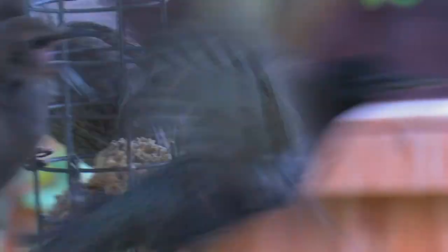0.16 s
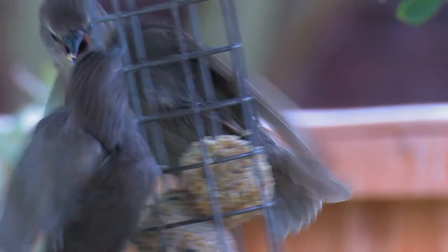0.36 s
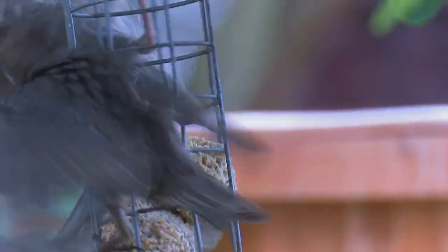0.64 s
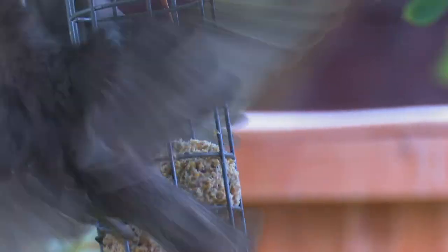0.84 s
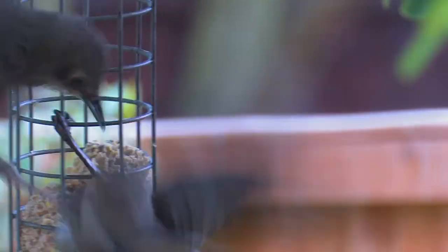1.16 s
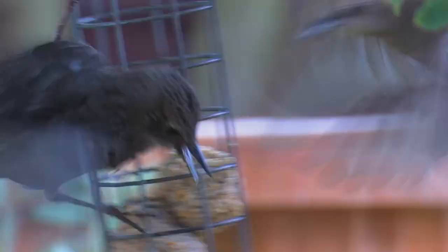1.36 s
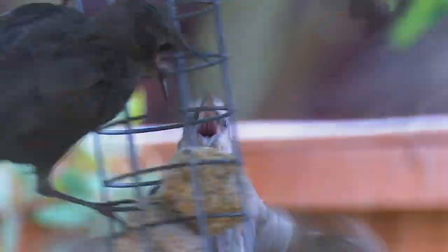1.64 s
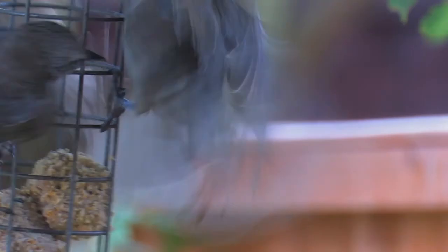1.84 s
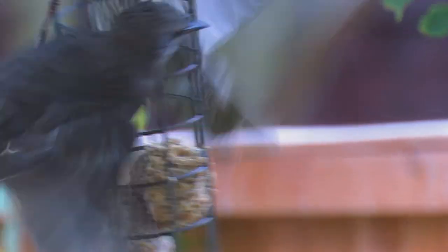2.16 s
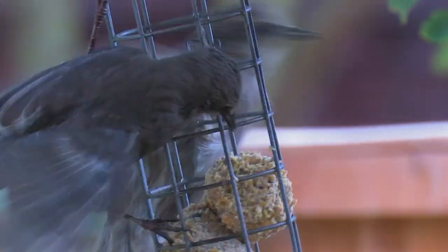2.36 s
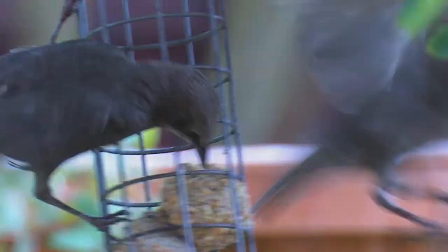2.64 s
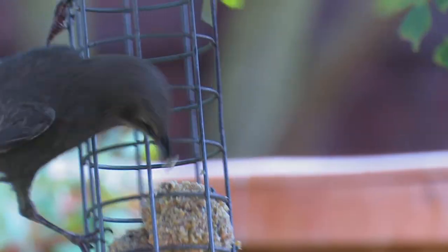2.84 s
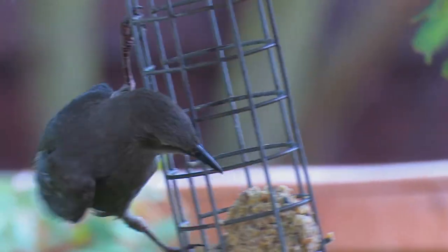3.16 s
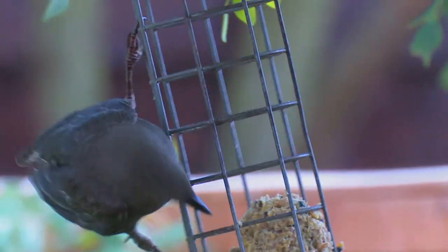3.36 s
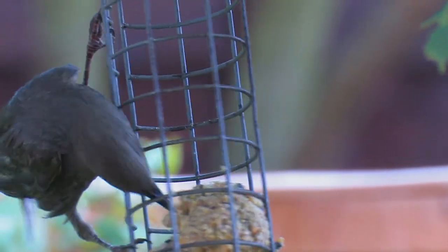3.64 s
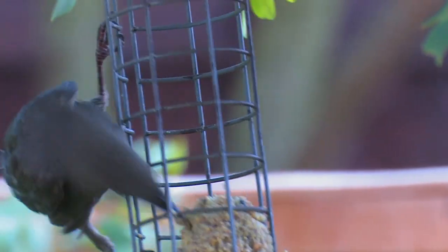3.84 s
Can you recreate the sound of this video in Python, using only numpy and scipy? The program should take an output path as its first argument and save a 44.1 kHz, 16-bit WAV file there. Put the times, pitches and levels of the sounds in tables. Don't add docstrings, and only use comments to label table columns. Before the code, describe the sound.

Young starlings squabble close by: harsh, two-toned squawks and gliding squeals overlap densely from 0 to 2.2 s, with rapid trills at the start and, louder, around 0.9 s. Faint wing whistles and a low engine drone fade within the first second. Calls thin out by 2.7 s. Hoarse distant pigeon coos run 2.1-3.8 s, with light claw ticks on wire, faint far whistles and soft rumble. Sharp squawks return at 3.85 s.

```python
import sys
import numpy as np
from scipy import signal
from scipy.fft import rfft, irfft, next_fast_len
from scipy.io import wavfile
from scipy.ndimage import uniform_filter1d, map_coordinates

SR = 44100
rng = np.random.default_rng(int(sys.argv[2]) if len(sys.argv) > 2 else 0)


def inscribe(sig):
    pcm = np.round(np.clip(np.atleast_2d(sig).T, -1, 1) * 32767)
    wavfile.write(sys.argv[1], SR, pcm.astype(np.int16))


def volts_from_decibels(level):
    exponent = np.asarray(level, float) / 20
    return 10 ** exponent


N = 176400
T = np.arange(N) / SR
ATTACK_S, RELEASE_S = 0.006, 0.016


def unit(x):
    return x / np.sqrt(np.mean(x ** 2) + 1e-20)


def along(points, hz):
    f, v = np.transpose(points)
    return np.interp(np.log(hz + 1), np.log(f + 1), v)


def wobble(rate, size):
    knots = rng.standard_normal(2400)
    return map_coordinates(knots, [np.arange(size) * min(rate / SR, 2390 / size)])


def noise(spectrum, size):
    m = next_fast_len(size + 8192)
    colour = volts_from_decibels(along(spectrum, np.fft.rfftfreq(m, 1 / SR)))
    return unit(irfft(rfft(rng.standard_normal(m)) * colour, m)[:size])


def gate(t, length, attack, release):
    return np.clip(np.minimum(t / attack, (length - t) / release + 0.5), 0, 1) ** 2


def hoarse(rough, size):
    rough = np.clip(rough, 0, 1)
    return np.sqrt(1 - rough ** 2) + rough * unit(wobble(1000, size))


def tone(hz, overtones_db, rough=0):
    turn = 2 * np.pi * np.cumsum(hz) / SR
    total = 0
    for k, db in enumerate([0, *overtones_db], start=1):
        audible = k * hz < SR / 2
        total = total + volts_from_decibels(db) * hoarse(rough * k, len(hz)) * np.sin(k * turn) * audible
    return np.sqrt(2) * total


def add(mix, s, sound):
    i = round(s * SR)
    mix[max(i, 0):i + len(sound)] += sound[max(-i, 0):N - i]


def squawk_voice(hz, size):
    rasp = volts_from_decibels(5 * np.minimum(wobble(150, size), 1))
    pitch = hz * np.exp(0.075 * wobble(150, size))
    return rasp * tone(pitch, [-17], rough=0.8)


def squawks():
    # (start [s], length [s], level [dB], upper voice [Hz])
    squawk_calls = [(-.02, 0.11, -40, 5500), (0.149, 0.1, -36, 5430), (0.052, 0.21, -37, 5170),
                    (0.292, 0.052, -27.5, 4770), (0.378, 0.095, -28, 5114), (0.431, .07, -32.5, 4590),
                    (0.448, 0.057, -31, 4177), (0.49, 0.15, -35.5, 4834), (0.584, 0.055, -32.5, 4984),
                    (0.717, 0.072, -34.5, 6440), (0.786, 0.08, -36, 5940), (0.861, 0.063, -34.5, 4420),
                    (0.913, 0.16, -37.5, 5790), (0.932, .14, -39.5, 4306), (1.138, 0.018, -33, 3994),
                    (1.321, 0.046, -39, 4366), (1.423, 0.063, -41.5, 3597), (1.49, 0.41, -43.5, 5920),
                    (1.578, 0.14, -38.5, 4400), (1.649, 0.2, -34, 5296), (1.709, 0.055, -33.5, 5300),
                    (1.761, 0.021, -49, 4660), (1.81, 0.09, -37, 4526), (1.868, 0.08, -39.5, 4580),
                    (1.98, 0.11, -34, 4785), (2.064, 0.088, -41.5, 4670), (2.153, 0.077, -37, 5000),
                    (2.349, 0.072, -40, 4810), (2.349, 0.069, -40.5, 3174), (2.46, 0.063, -34.5, 5150),
                    (2.459, 0.057, -37, 3500), (2.159, 0.056, -44.5, 2890), (2.636, 0.022, -36, 5840),
                    (3.845, 0.054, -46, 4300), (3.858, 0.11, -45, 3216), (3.942, .08, -45.5, 4490),
                    (3.963, .06, -44, 2910), (3.409, 0.16, -61, 2580), (3.468, 0.06, -68, 3900),
                    (3.636, 0.09, -67.5, 5500), (1.222, 0.044, -45, 4500), (1.371, 0.048, -48, 4520),
                    (1.434, 0.047, -49.5, 6560), (3.247, 0.11, -59.5, 3900)]
    # (frequency [Hz], density [dB per Hz])
    gape_breath = [(710, -35), (1200, -28.5), (5410, -14), (6440, -12), (9610, -25), (16000, -40)]
    breath_voice_hz = 4900
    mix, t = np.zeros(N), T[:int(0.25 * SR)]
    for s, length, db, hz in squawk_calls:
        upper = squawk_voice(hz, len(t))
        lower = volts_from_decibels(-3) * squawk_voice(hz * 0.68, len(t))
        lowest = volts_from_decibels(-12) * squawk_voice(hz * 0.46, len(t))
        voices = unit(upper + lower + lowest)
        gape = [(f * hz / breath_voice_hz, level) for f, level in gape_breath]
        breath = unit(volts_from_decibels(2.5 * wobble(38, len(t))) * noise(gape, len(t)))
        envelope = volts_from_decibels(db - 2.5) * gate(t, length, ATTACK_S, RELEASE_S)
        add(mix, s, envelope * (voices + volts_from_decibels(-5) * breath))
    return mix


def squeal_strand(hz, rough, waver, overtones_db):
    flutter = volts_from_decibels(rough * 7 * np.minimum(wobble(113.0, len(hz)), 0.5))
    pitch = hz * np.exp(rough * waver * wobble(194.7, len(hz)))
    return flutter * tone(pitch, overtones_db, rough)


def glide(db, rough, points, waver, overtones_db):
    s, hz = np.transpose(points)
    t = T[:int(0.4 * SR)]
    pitch = uniform_filter1d(np.interp(t + s[0], s, hz), size=200)
    main = squeal_strand(pitch, rough, waver, overtones_db)
    lower = squeal_strand(pitch * 0.8, 0.645, waver, overtones_db)
    both = main + rough * volts_from_decibels(-11.5) * lower
    return volts_from_decibels(db) * gate(t, s[-1] - s[0], ATTACK_S, RELEASE_S) * unit(both)


def squeals():
    # (level [dB], roughness [0-1], pitch points (time [s], pitch [Hz]))
    early_cries = [(-41.5, 0.34, [(-.01, 4100), (.05, 3440)]), (-35, 0.65, [(.19, 3000), (.235, 3080),
                   (.26, 3404), (.295, 2780)]), (-44, .6, [(.01, 6040), (.04, 6640), (.06, 6500)]),
                   (-43.5, .6, [(.165, 4900), (.195, 5740), (.24, 6000), (.29, 5350)]),
                   (-36.5, 0.28, [(.44, 2950), (.53, 3450), (.578, 2920)]), (-37.5, 0.67, [(.44, 6140),
                   (.49, 6850), (.54, 6360), (.58, 5780)]), (-36, 0.4, [(.622, 7500), (.665, 6380),
                   (.692, 6380)]), (-43, .6, [(.365, 2700), (.42, 2113)]), (-30.5, 0.58, [(.728, 5440),
                   (.78, 5950)]), (-44, 0.485, [(.76, 6900), (.8, 7250), (.87, 6480)]),
                   (-46, 0.91, [(.73, 3000), (.77, 2580), (.86, 3400)]), (-38.5, 0.57, [(1.03, 4855),
                   (1.15, 4830)]), (-45.5, 0.4, [(1.07, 2247), (1.105, 3310), (1.14, 3220)]),
                   (-42, 0.42, [(1.237, 6200), (1.255, 6720), (1.28, 6720), (1.3, 6190), (1.325, 6370),
                   (1.345, 6870), (1.375, 6500)]), (-46, 0.45, [(1.34, 3276), (1.42, 3080)]),
                   (-39.5, .3, [(1.423, 3410), (1.44, 2970)]), (-47.5, 0.27, [(1.465, 2550), (1.49, 2600)])]
    # (level [dB], roughness [0-1], pitch points (time [s], pitch [Hz]))
    late_cries = [(-36, 0.48, [(1.507, 4450), (1.525, 4240), (1.56, 4410), (1.575, 4130)]),
                  (-31.5, 0.43, [(1.572, 3610), (1.588, 3860), (1.6, 3460)]), (-37, .7, [(1.605, 4500),
                  (1.635, 4530)]), (-29, 0.57, [(1.65, 4395), (1.667, 5530), (1.685, 5550), (1.702, 4600)]),
                  (-32, 0.66, [(1.53, 5390), (1.552, 5600)]), (-43, 0.55, [(1.598, 2413), (1.635, 2800)]),
                  (-49.5, 0.42, [(1.85, 2500), (1.875, 2735), (1.925, 2540)]), (-30.5, 0.79, [(1.75, 4700),
                  (1.775, 5950), (1.79, 6710), (1.815, 6300)]), (-31, 0.57, [(1.752, 4610), (1.77, 4610),
                  (1.79, 3570)]), (-29.5, 0.92, [(1.81, 5260), (1.83, 4656), (1.85, 3810)]),
                  (-38.5, 0.56, [(1.94, 5500), (1.965, 5170), (1.99, 6050), (2.03, 5380), (2.05, 4860)]),
                  (-45, 0.33, [(1.97, 2900), (1.986, 2970)]), (-32.5, 0.75, [(2.0, 4510), (2.04, 4400),
                  (2.07, 4254), (2.095, 4900), (2.122, 5890), (2.16, 5240)]), (-42, 0.65, [(2.165, 3190),
                  (2.18, 5300), (2.203, 5600), (2.215, 4200), (2.233, 3600)]), (-37, 0.59, [(2.638, 3380),
                  (2.648, 5460), (2.662, 6530), (2.69, 6560), (2.71, 6050)]), (-44, .5, [(2.697, 6000),
                  (2.706, 3750), (2.714, 2200)]), (-56.5, 0.6, [(3.26, 6100), (3.295, 6200), (3.315, 7300),
                  (3.33, 7450)]), (-26, 0.075, [(3.949, 4120), (3.954, 4400)])]
    # (level [dB], roughness [0-1], pitch points (time [s], pitch [Hz]))
    far_whistles = [(-55, 0.69, [(3.41, 1850), (3.48, 1890), (3.5, 2426), (3.56, 2390)]),
                    (-52.5, 0.67, [(3.5, 1783), (3.565, 1860)]), (-63, 0.51, [(3.32, 2017), (3.4, 2040)]),
                    (-70.5, 0.3, [(3.65, 2400), (3.84, 2450)]), (-62, 0.32, [(3.54, 2233), (3.63, 2480)]),
                    (-64, 0.31, [(3.655, 2800), (3.79, 2990), (3.84, 2930)]), (-64.5, 0.21, [(3.73, 1452),
                    (3.84, 1493)])]
    mix = np.zeros(N)
    for db, rough, points in early_cries + late_cries:
        add(mix, points[0][0], glide(db, rough, points, waver=0.03, overtones_db=[-21.5]))
    for db, rough, points in far_whistles:
        add(mix, points[0][0], glide(db, rough, points, waver=0.012, overtones_db=[]))
    return mix


def trills():
    # (first peak [s], length [s], level [dB], beat rate [per s], low pitch [Hz])
    trill_calls = [
        (0.039, 0.23, -24.5, 54.2, 2910),
        (.919, 0.15, -18, 61, 2948),
    ]
    mix, t = np.zeros(N), T[:int(0.25 * SR)]
    for s, length, db, rate, hz in trill_calls:
        beat = np.abs(np.sin(np.pi * rate * t)) ** 4
        pitch = hz * (1 + 0.52 * beat) * np.exp(0.0326 * wobble(200, len(t)))
        swell_db = 4 * (beat - 3.5) + 1.8 * wobble(212.0, len(t))
        level = volts_from_decibels(db + swell_db) * gate(t, length, 0.029, 0.073)
        drone = volts_from_decibels(-8) * tone(hz * np.exp(0.0413 * wobble(120, len(t))), [-15], rough=0.7)
        add(mix, s - 0.5 / rate, level * (tone(pitch, [-17], rough=0.45) + drone))
    return mix


def wings():
    # (start [s], level [dB], start pitch [Hz])
    wing_strokes = [(0.028, -51.5, 1235), (.17, -50, 1124), (.27, -50.5, 1040), (0.371, -51, 1187),
                    (0.483, -52, 1237)]
    length_s, fall = 0.07, 0.3
    mix, t = np.zeros(N), T[:int(0.1 * SR)]
    for s, db, hz in wing_strokes:
        pitch = hz * (1 - fall * t / length_s) * np.exp(0.061 * wobble(179, len(t)))
        envelope = volts_from_decibels(db - 1.0) * gate(t, length_s, 0.0056, 0.058)
        add(mix, s, envelope * tone(pitch, [-5], rough=0.25))
    return mix


def claws():
    # (time [s], peak level [dB], decay t60 [s])
    claw_ticks = [(2.9316, -32.5, 0.0037), (2.9687, -46, 0.0085), (3.003, -36, 0.019), (4, -48, 0.0047),
                  (3.5114, -45, 0.006), (3, -52, 0.0061), (2.8, -40, 0.13), (2.1, -42, .006),
                  (2.413, -42, .005), (3.637, -26, 0.017)]
    # (frequency [Hz], density [dB per Hz])
    wire_ring = [(1200, 3), (3500, 19), (7000, 7), (15000, -1)]
    mix, t = np.zeros(N), T[:int(0.1 * SR)]
    for s, db, t60 in claw_ticks:
        decay_db = -60 * t / max(t60, 0.002)
        add(mix, s, volts_from_decibels(db - 10 + decay_db) * noise(wire_ring, len(t)))
    return mix


def pigeon():
    # (start [s], length [s], level [dB], start pitch [Hz], end pitch [Hz])
    coo_notes = [(2.075, 0.264, -51.5, 370, 373.4), (2.349, 0.267, -48, 400, 413.3),
                 (2.155, 0.366, -53.5, 545, 536), (2.779, 0.34, -49.5, 398, 325.3),
                 (2.82, 0.188, -55.5, 520, 520), (3.355, 0.18, -50.5, 376.7, 325.4),
                 (3.623, 0.222, -49.5, 365, 345), (3.43, .13, -54, 500, 560), (3.63, 0.193, -61, 470, 490),
                 (3.04, 0.092, -58, 330, 266)]
    # (frequency [share of pitch], density [dB per Hz])
    coo_breath = [(.6, -28), (.85, 2), (1.3, -6.5), (1.7, -43)]
    edge_s = 0.03
    mix, t = np.zeros(N), T[:int(0.5 * SR)]
    for s, length, db, start_hz, end_hz in coo_notes:
        slide = start_hz + (end_hz - start_hz) * t / length
        pitch = slide * np.exp(0.016 * wobble(47.3, len(t)))
        breath = volts_from_decibels(-8) * noise([(share * start_hz, level) for share, level in coo_breath], len(t))
        purr = 1 + 0.28 * wobble(79.5, len(t))
        envelope = volts_from_decibels(db) * gate(t, length, edge_s, edge_s)
        add(mix, s, envelope * (purr * tone(pitch, []) + breath))
    return mix


def garden(x):
    # (frequency [Hz], decay t60 [s])
    garden_decay = [(300, 0.39), (6000, 0.46), (12000, 0.5)]
    delay_s = 0.012
    hz, t, z = signal.stft(rng.standard_normal(SR), SR, nperseg=256)
    decay = volts_from_decibels(-60 * t / along(garden_decay, hz)[:, None])
    tail = signal.istft(z * decay, SR, nperseg=256)[1]
    delayed = np.pad(x, (int(delay_s * SR), 0))
    return signal.fftconvolve(delayed, tail / np.linalg.norm(tail))[:N]


def town():
    # (time [s], pitch [Hz], level [dB])
    engine_drone = [(0.0, 83.1, -41.5), (0.364, 83.96, -41.5), (0.6, 87.6, -48.5)]
    # (pitch [Hz], level [dB])
    machine_hums = [(59, -52.5), (98, -57.5), (150, -60.5)]
    # (frequency [Hz], density [dB per Hz])
    traffic_colour = [(12, -36), (20, 8), (235, -7), (382, -9.5), (646, -12.5), (1480, -17), (2050, -26),
                      (3250, -60), (5500, -120)]
    # (time [s], level [dB])
    traffic_level = [(0.0, -54), (1.5, -54), (4.0, -56)]
    # (frequency [Hz], density [dB per Hz])
    hiss_colour = [(1180, -28), (2000, 0.5), (13300, -9), (16000, -9)]
    s, hz, db = np.transpose(engine_drone)
    drone_db = np.interp(T, [*s, s[-1] + 0.35], [*db, -90])
    mix = volts_from_decibels(drone_db + 0.89 * wobble(9.1, N)) * tone(np.interp(T, s, hz), [-14])
    for hum_hz, hum_db in machine_hums:
        pitch = hum_hz * np.exp(0.0481 * wobble(12, N))
        mix += volts_from_decibels(hum_db + 2.25 * wobble(5.89, N)) * tone(pitch, [])
    rumble_db = np.interp(T, *np.transpose(traffic_level)) + 7 + 1.63 * wobble(6.46, N)
    mix += volts_from_decibels(rumble_db) * noise(traffic_colour, N)
    return mix + volts_from_decibels(-67.5) * noise(hiss_colour, N)


def scene():
    birds = squawks() + squeals() + trills() + pigeon()
    echoes = volts_from_decibels(-7.5) * garden(birds)
    return (birds + echoes + wings() + claws() + town())[None]


def low_pass(x):
    return signal.sosfilt(signal.butter(12, 16470, fs=SR, output="sos"), x)


def record(dry):
    top_hz = 15830
    kept = irfft(rfft(dry) * (np.fft.rfftfreq(N, 1 / SR) < top_hz), N)
    return low_pass(kept)


dry = scene()
out = record(dry)
inscribe(out)
```